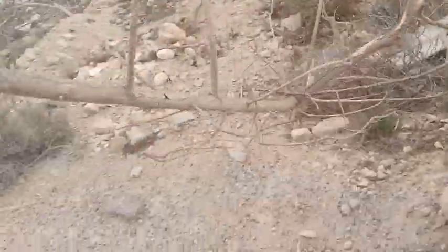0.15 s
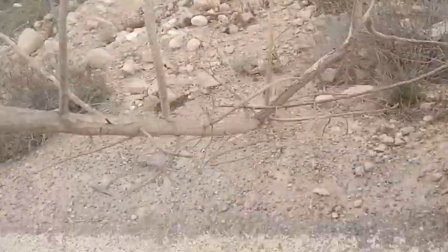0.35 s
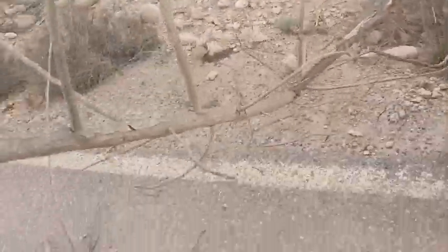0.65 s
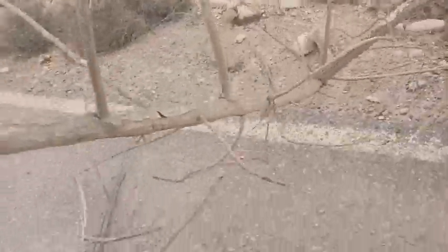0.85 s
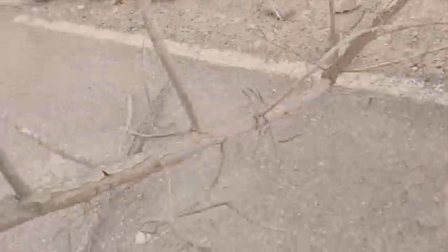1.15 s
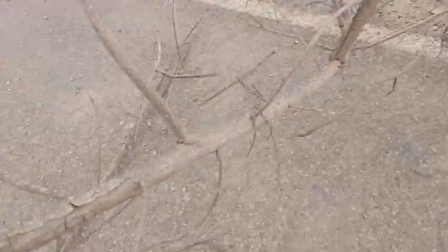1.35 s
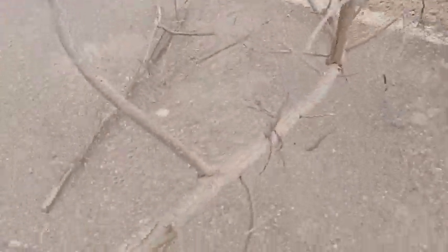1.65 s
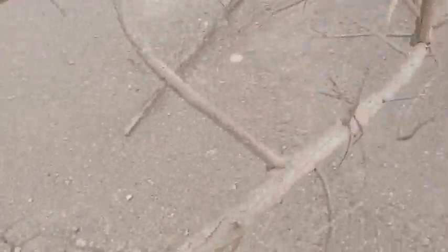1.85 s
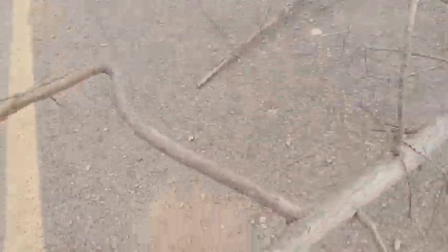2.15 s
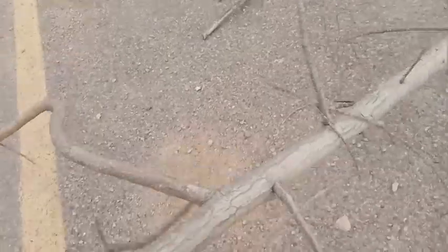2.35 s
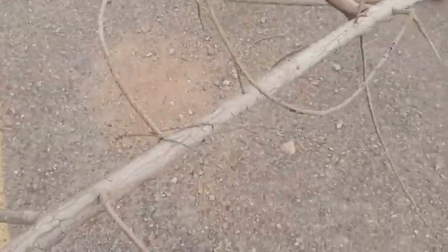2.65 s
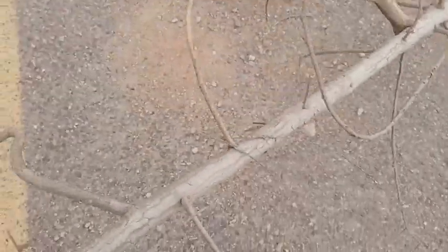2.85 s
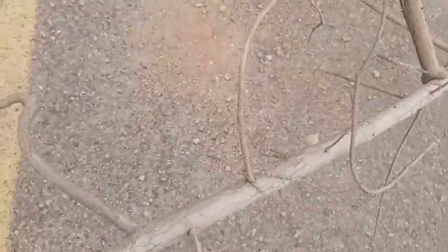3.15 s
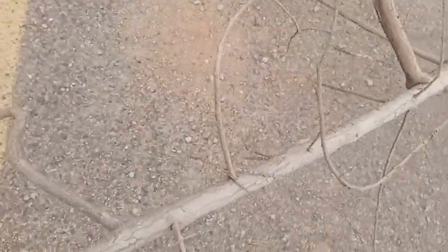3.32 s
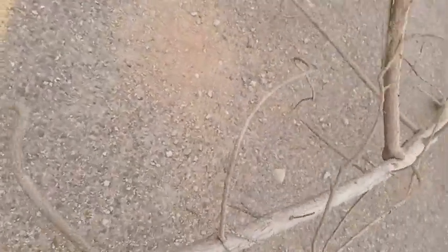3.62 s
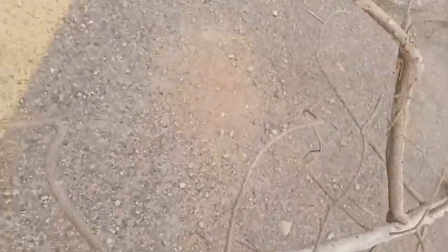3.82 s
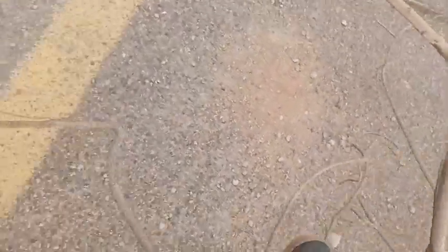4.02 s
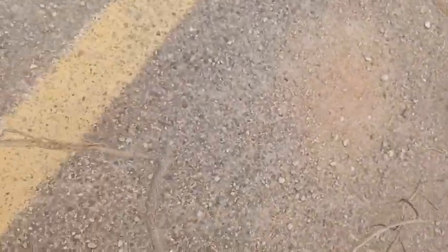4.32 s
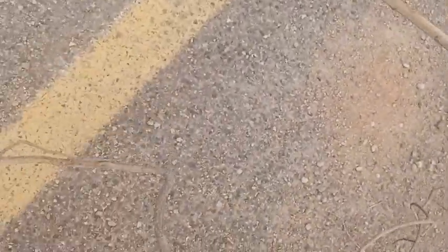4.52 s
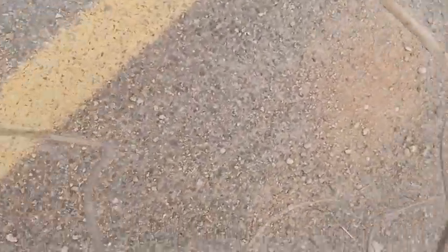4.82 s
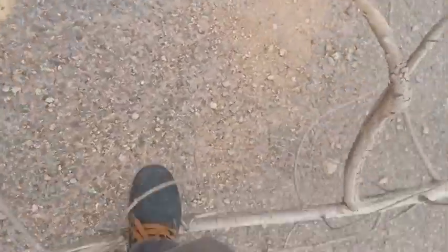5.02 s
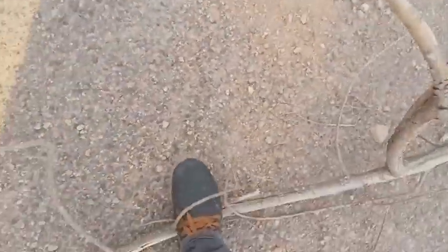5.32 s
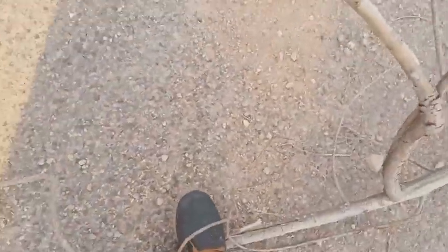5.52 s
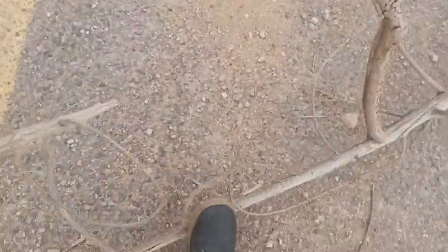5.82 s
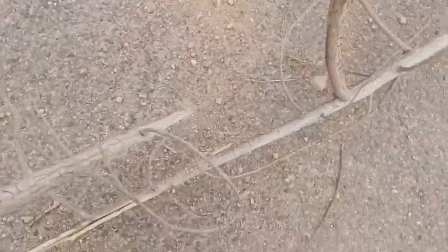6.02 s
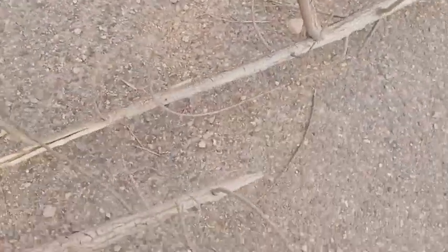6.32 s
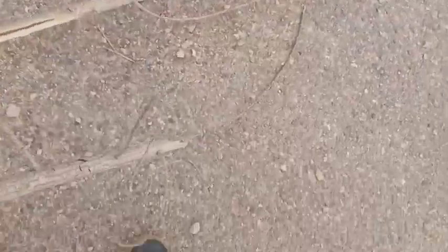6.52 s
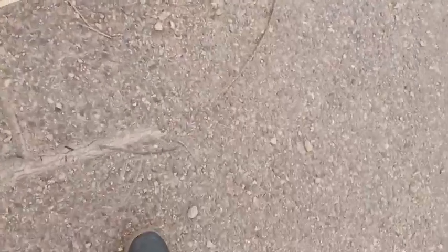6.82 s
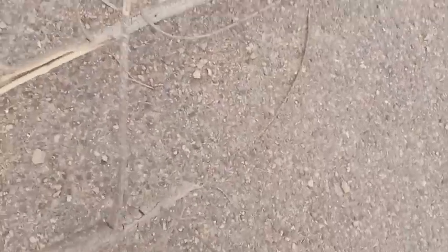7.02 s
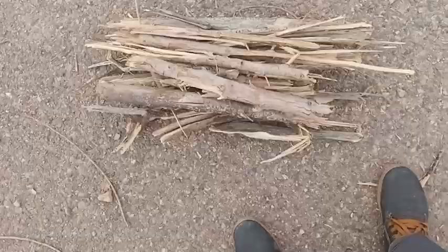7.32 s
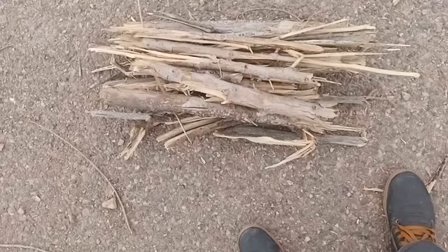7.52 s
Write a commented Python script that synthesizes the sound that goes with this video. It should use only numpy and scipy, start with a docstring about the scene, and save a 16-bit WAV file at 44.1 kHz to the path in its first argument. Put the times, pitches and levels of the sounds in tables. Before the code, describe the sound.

Outdoors, close to a hand-held stereo microphone, dry twigs rasp and tick across rough asphalt while wood cracks, knocks and hums dully. After a lull with only small clicks, treading brings crisp splintering, loudest about two thirds through. Wind then buffets the left side with soft low thumps, mingled with a few hollow wood knocks, over faint distant air, before a sudden cut to silence.

```python
"""A dead branch on a gritty road, close to a hand-held camera with two microphone ports of unlike colour.
From the start twig tips scrape, skip and tick (banded noise, short tones), over gusts of low noise at the left port
and faint distant air. Wood snaps (bursts of tiny cracks), knocks and rings (fading sines); the thick end hums in
its low modes. The drag quietens near 3 s; from 4.45 s the branch is trodden on, loudest near 5 s; gusts and
single thumps of air return after 5.3 s. The sound stops short at 7.3 s, before the end."""
import sys
import numpy as np
from scipy import signal
from scipy.io import wavfile
from scipy.ndimage import uniform_filter1d

SR = 44100
rng = np.random.default_rng(int(sys.argv[2]) if len(sys.argv) > 2 else 0)


def dump(signal):
    """Clip the signal to [-1, 1] and save it as 16-bit WAV at the path in sys.argv[1]."""
    limited = np.clip(np.atleast_2d(signal).T, -1, 1)
    pcm = np.round(limited * 32767).astype(np.int16)
    wavfile.write(sys.argv[1], SR, pcm)


N = 337663

# drag of the twigs over the road, ahead of the port colours: t/s, twig level/dB, wood level/dB, grit level/dB
DRAG_CURVE = [(0, -42, -46.5, -40), (.4, -41, -42, -42), (.7, -47.5, -50, -45.5), (1.01, -32, -37, -42.5),
              (1.17, -35.5, -37, -38), (1.35, -45.5, -40, -44.5), (2, -40.5, -38.5, -47),
              (2.54, -43, -41.5, -44), (2.76, -50, -54, -54.5), (3.2, -52, -63, -60),
              (3.6, -56, -49, -59.5), (3.9, -46.5, -51, -55), (4.2, -51.5, -56, -56.5),
              (4.45, -46.5, -54.5, -53.5), (4.85, -38, -51.5, -42), (5.1, -30, -33, -33.5),
              (5.35, -41.5, -44, -43.5), (5.57, -54, -48.5, -55.5), (6.05, -59.5, -50, -67),
              (6.62, -49.5, -39, -60.5), (7.04, -48, -45.5, -56.5), (7.3, -65.5, -53.5, -67.5)]
# what each microphone port makes of a flat sound: f/Hz, left level/dB, right level/dB
PORT_COLOURS = [(200, -4, -4), (500, -6, -4), (850, -4, -2), (1400, -7, -3), (2000, -8, -2),
                (2600, -11, -4), (3500, -12, 2), (4200, -13, 0), (5000, -13, -6), (6600, -13, -16),
                (7200, -15, -24), (7800, -20, -29), (9000, -15, -19), (11500, -18, -21), (13700, -21, -27),
                (14300, -14, -18), (14800, -10, -13), (15700, -12, -15), (17000, -12, -15)]
# bands of wood, twigs and grit, one row each: low f/Hz, high f/Hz
MATERIAL_BANDS = [(400, 2450), (2450, 5400), (5400, 18000)]
# left-right likeness of the noise of wood, twigs and grit [0 to 1]
LIKENESS = [.8, .4, .25]


def gain_of(db):
    """Amplitude factor of a level in dB."""
    return 10 ** (np.asarray(db) / 20)


def evened(x):
    """Scale to unit rms over all channels."""
    return x / np.sqrt(np.mean(x ** 2) + 1e-20)


def read(points, hz):
    """Columns of a spectrum table on a log-frequency axis."""
    f, *columns = np.transpose(points)
    return np.array([np.interp(np.log(hz + 1), np.log(f + 1), c) for c in columns])


def follow(rows):
    """Columns of a curve table at every sample."""
    s, *columns = np.transpose(rows)
    return [np.interp(np.arange(N) / SR, s, c) for c in columns]


def sides(pan_db):
    """Left and right gains for a level difference; positive leans left."""
    return gain_of(np.array([pan_db / 2, -pan_db / 2]))


def causal(db, size=4096):
    """Minimum-phase taps of a gain curve given on the half circle."""
    log_gain = np.log(gain_of(np.maximum(db, -100)))
    circle = np.concatenate([log_gain, log_gain[..., -2:0:-1]], -1)
    spectrum = np.exp(np.conj(signal.hilbert(circle)))
    return np.fft.ifft(spectrum).real[..., :size // 2]


def paired(a, b, alike):
    """Two channels that share a part of their noise."""
    alike = np.clip(alike, 0, 1)
    return np.array([a, alike * a + np.sqrt(1 - alike ** 2) * b])


def add(mix, s, sound):
    """Lay a sound into the mix at s seconds, cut at the end."""
    part = mix[..., round(s * SR):][..., :sound.shape[-1]]
    part += sound[..., :part.shape[-1]]


def resonate(x, hz, width):
    """One damped mode driven by x, with unit gain for noise."""
    r = np.exp(-np.pi * width / SR)
    feedback = [1, -2 * r * np.cos(2 * np.pi * hz / SR), r * r]
    return signal.lfilter([1, 0, -1], feedback, x) * np.sqrt((1 - r * r) / 2)


def grains(per_s, spread_db, decay_s):
    """Loudness contours of random tiny slips, each stronger in some bands (wood, twigs, grit) than in others."""
    size = gain_of(spread_db * np.minimum(rng.exponential(1, N), 3.5)) * (rng.random(N) < per_s / SR)
    size = size * gain_of(2.5 * rng.standard_normal((3, N)))
    t = np.arange(1500) / SR
    slip = np.exp(-t / decay_s) * (1 - np.exp(-t / 0.00062))
    slips = signal.oaconvolve(size, slip[None], axes=1)[:, :N]
    return slips / np.sqrt(np.mean(slips ** 2))


def place_db():
    """Left-right place of the branch, drifting slowly to the left."""
    start_db, drift_db_per_s = -0.84, 0.57
    return start_db + drift_db_per_s * np.arange(N) / SR


def ports(drive):
    """Wood, twig and grit drives each pass their own band of the two port colours, evened to a common gain."""
    hz, out = np.fft.rfftfreq(4096, 1 / SR) + 1, 0
    for part, (low_hz, high_hz) in zip(drive, MATERIAL_BANDS):
        skirt_db = -10 * np.log10((1 + (low_hz / hz) ** 6) * (1 + (hz / high_hz) ** 6))
        taps = causal(read(PORT_COLOURS, hz) + skirt_db)
        out = out + signal.oaconvolve(part, 2 * taps / np.linalg.norm(taps), axes=1)[:, :N]
    return out


def scrape(rub=0.81):
    """Twig tips rub steadily and skip from stone to stone: noise under a steady and a grainy contour."""
    twig_db, wood_db, grit_db = follow(DRAG_CURVE)
    skips = grains(350, 4.5, .004)
    touch = evened(rub + skips) * gain_of([wood_db, twig_db, grit_db])
    noise, place = rng.standard_normal((3, 2, N)), sides(place_db())
    out = np.array([level * place * paired(*n, c) for level, n, c in zip(touch, noise, LIKENESS)])
    out[:, 0] = np.roll(out[:, 0], 6, axis=1)  # samples; the tips lie nearer the right port
    return out


def ticks(count=30, spread_db=3.0):
    """Many small twigs, each with its own damped note, tick on the stones while the branch drags."""
    ticks_per_s, tick_db = 200, -4.5
    fade_cycles, lowest_hz, highest_hz = 2.5, 437, 6340
    twig_db, wood_db, _ = follow(DRAG_CURVE)
    out, t = np.zeros((2, N)), np.arange(2000) / SR
    size = gain_of(spread_db * np.minimum(rng.exponential(1, N), 3.5)) * (rng.random(N) < ticks_per_s / SR)
    which = rng.integers(0, count, N)
    for k, hz in enumerate(np.geomspace(lowest_hz, highest_hz, count)):
        ring = np.sin(2 * np.pi * hz * t) * np.exp(-t * hz / fade_cycles)
        left_db, right_db = read(PORT_COLOURS, hz)
        drag_db = wood_db if hz < MATERIAL_BANDS[0][1] else twig_db
        level = gain_of(max(left_db, right_db) + drag_db)
        train = signal.oaconvolve(size * (which == k), ring / np.linalg.norm(ring))[:N]
        out += sides(left_db - right_db)[:, None] * level * train
    return gain_of(tick_db) * out / np.sqrt(np.mean(size ** 2))


def thick_end(bumps_per_s=120):
    """The heavy end bumps over stones and hums in its low modes."""
    # how hard the thick end drags: t/s, rms level/dB
    drag_levels = [(0, -81), (1.1, -52), (1.6, -35), (2.3, -34), (2.7, -51.5), (4.3, -51.5), (5, -43.5),
                   (5.6, -47.5), (6.2, -42), (7, -36), (7.31, -43.5)]
    # modes of the thick end: f/Hz, width/Hz, relative level/dB
    modes = [(242, 120, 15), (483.6, 76, 8), (620, 144, 12.5), (938, 39, -3)]
    t = np.arange(1500) / SR
    hits = rng.exponential(1, N) * (rng.random(N) < bumps_per_s / SR)
    bumps = signal.oaconvolve(hits, np.exp(-t / 0.0084))[:N]
    drive = paired(*rng.standard_normal((2, N)), 0.77) * (0.55 + evened(bumps))
    hum = sum(gain_of(db) * resonate(resonate(drive, hz, 2 * width), hz, width) for hz, width, db in modes)
    return gain_of(follow(drag_levels)[0]) * evened(hum)


def gusts():
    """Contour of the wind: each gust rises fast, holds and dies away over a light breeze, summed in power."""
    # gusts at the ports: t/s when fully risen, hold/s, relative level/dB
    gust_rows = [(0, 0.15, -28.5), (0.284, 0.25, -30.5), (0.778, 0.54, -32), (1.59, 0.17, -35),
                 (2.082, 0.18, -35), (2.532, 0.13, -38.5), (2.928, 0.012, -41.5), (3.105, 0.28, -40),
                 (3.6, 0.18, -41), (4.012, 0.0062, -33), (4.26, 0.035, -37.5), (4.75, 0.11, -40.5),
                 (5.36, 0.091, -27.5), (6.109, 0.04, -28.5), (6.354, 0.18, -27), (6.614, 0.036, -24.5),
                 (6.961, 0.022, -30)]
    rise_s, fall_db_per_s, breeze_db = 0.036, 130.5, -48  # breeze on the same relative scale
    t, power = np.arange(N) / SR, gain_of(breeze_db) ** 2
    for s, hold, db in gust_rows:
        rise = np.clip((t - s) / rise_s + 1, 0, 1)
        fall_db = fall_db_per_s * np.maximum(t - s - hold, 0)
        power = power + (rise * gain_of(db - fall_db)) ** 2
    return np.sqrt(power)


def wind(lumps_db=6.5, lump_s=.012, shelter_db=-14):
    """Eddies buffet each port on their own: low noise in short lumps; the right port is sheltered."""
    # colour of the wind rumble: f/Hz, relative level/dB
    rumble_colour = [(25, -44), (45, -23.5), (65, -1.5), (110, 1.5), (190, -3), (300, -10.5), (450, -19),
                     (800, -37), (2000, -62.5)]
    noise, lumps = rng.standard_normal((2, 2, N))
    width = int(lump_s * SR)
    lumps = evened(uniform_filter1d(uniform_filter1d(lumps, width), width))
    lumpy = noise * gain_of(lumps_db * np.tanh(lumps / 2) * 2)
    taps = causal(read(rumble_colour, np.fft.rfftfreq(4096, 1 / SR)))
    rumble = evened(signal.oaconvolve(lumpy, taps, axes=1)[:, :N])
    return 2 * gusts() * rumble * gain_of([[0], [shelter_db]])


def air():
    """Smooth distant hiss of the open country: steady coloured noise, almost unlike at the two ports."""
    # colour of the distant air: f/Hz, relative density level/dB per Hz
    hiss_colour = [(100, -61), (400, -76), (1500, -69), (5000, -114.5), (16000, -142)]
    a, b = rng.standard_normal((2, N))
    taps = causal(read(hiss_colour, np.fft.rfftfreq(4096, 1 / SR))) * np.sqrt(SR / 2)
    return signal.oaconvolve(paired(a, b, 0.058), taps, axes=1)[:, :N]


def snaps(tail_db_per_s=4000, steady=.5):
    """Fibres splinter in a run of tiny cracks; the thicker wood rings briefly; sound reaches one port first."""
    # snaps, knocks and scuffs: t/s, length/s, twig level/dB, wood and grit level/dB relative to the twigs
    events = [(0.014, 0.039, -40.5, 10, 3), (0.201, 0.073, -34, -15, 1), (0.302, 0.034, -31, 4, 1.5),
              (0.322, 0.022, -23, -19.5, -7.5), (0.348, 0.029, -33.5, 10, 2),
              (0.387, 0.022, -30.5, 1, -2.5), (0.517, 0.0083, -34.5, -1, -4),
              (0.541, 0.017, -27.5, -6, 4.5), (0.732, 0.02, -42, 6.5, 5.5), (0.777, 0.031, -34, 0, -12),
              (0.806, 0.031, -35, 6.5, -7), (0.836, 0.007, -26.5, 1, -20), (0.865, 0.0083, -26, 0.5, 1.5),
              (0.903, 0.045, -31.5, 5, -3), (0.937, 0.017, -27.5, -11, 7), (0.955, 0.01, -31, 0, 12),
              (0.975, 0.016, -29, -1, 1), (1.041, 0.026, -29, 6, -26), (1.071, 0.025, -29, -7, 4.5),
              (1.117, 0.021, -39.5, 13.5, -15), (1.155, 0.024, -26.5, 1.5, 2.5),
              (1.188, 0.029, -26.5, 0.5, -7), (1.223, 0.0086, -22, 5.5, -7), (1.295, 0.021, -27, 0, -2.5),
              (1.338, 0.014, -27.5, 5.5, -9), (1.394, 0.0062, -22.5, -2, -40.5),
              (1.445, 0.0081, -40.5, 13.5, 10.5), (1.487, 0.018, -39, 7.5, -13),
              (1.582, 0.023, -37, -14, 1), (1.641, 0.016, -27, -0.5, -3.5), (1.669, 0.035, -33.5, 2, -3),
              (1.721, 0.034, -25.5, -1.5, -9), (1.77, 0.0072, -38, 7, 9.5), (1.85, .008, -27.5, -11, -2),
              (1.891, 0.012, -22.5, -1, -2.5), (1.936, 0.0077, -29.5, 7, -0.5), (1.945, 0.058, -34, 10, -1),
              (2.003, 0.002, -22.5, 7, -15), (2.112, 0.031, -40.5, 3, 4), (2.22, 0.015, -34.5, -6, 5.5),
              (2.29, 0.0078, -30, 4.5, -3), (2.509, 0.023, -36.5, 1, 7.5), (2.526, 0.079, -29, -1.5, 4.5),
              (2.595, 0.042, -33, 2.5, 3.5), (2.643, 0.033, -21.5, -5.5, -4.5),
              (2.689, 0.018, -29, -5.5, 1.5), (2.718, 0.026, -36.5, 3.5, 4), (2.868, 0.02, -43.5, 2, 5.5),
              (2.909, 0.075, -37.5, -3.5, 3), (3.049, 0.014, -41, 0, -3), (3.103, .001, -27, 1, -10),
              (3.181, 0.024, -39, 1.5, 9.5), (3.237, 0.02, -45.5, 5, 7.5), (3.279, 0.032, -39, 2, 2),
              (3.3238, 0.0018, -23.5, -2, 10), (3.345, 0.029, -45, 12.5, -6), (3.384, 0.01, -53.5, 6, 18),
              (3.452, 0.0044, -34.5, 0, -6), (3.678, 0.015, -39, -2.5, 11.5),
              (3.752, 0.035, -31.5, -6.5, 3), (3.821, 0.0069, -34.5, -26, 13.5),
              (3.832, 0.033, -22, -9, -3.5), (3.864, 0.012, -44, 0, 21), (3.931, 0.041, -39.5, -1, 0),
              (3.993, 0.0055, -38, 3, 16.5), (4.01, 0.03, -34.5, -16, 4.5), (4.043, 0.025, -31.5, -7, 4),
              (4.098, 0.032, -31, -6, 0.5), (4.229, 0.013, -26.5, -38, 2.5),
              (4.248, 0.0042, -27.5, -34, 14), (4.255, 0.039, -27.5, -16, -1), (4.323, 0.034, -42, -24, 4),
              (4.376, .002, -25, -25, 0), (4.385, 0.0027, -29, -28, -1), (4.396, 0.0028, -25, -29, 2),
              (4.402, 0.027, -28.5, -6, 2.5), (4.471, 0.0054, -22.5, -15, -1.5),
              (4.504, 0.0026, -23, -27, 0.5), (4.519, 0.0037, -25, -26, -6),
              (4.552, 0.0097, -48.5, 14, -10), (4.596, 0.0072, -28, -29, 7.5),
              (4.61, 0.012, -22, -10.5, -4), (4.636, 0.0072, -25, -2.5, 9.5),
              (4.643, 0.051, -30.5, -3.5, 5), (4.676, 0.0061, -28.5, -23, -10.5),
              (4.73, 0.029, -26.5, -15.5, 4.5), (4.759, 0.0058, -21, -17, -13),
              (4.797, 0.0063, -31, -22, 6), (4.81, 0.012, -30.5, -4, 5.5), (4.854, 0.0074, -35, -15.5, 9.5),
              (4.908, 0.026, -18, -1, 0), (4.977, 0.0019, -16.5, -5, 3.5), (4.982, 0.017, -28.5, 5, -22),
              (5.003, 0.017, -20.5, -2, -11), (5.026, 0.017, -21.5, -0.5, 2), (5.045, 0.025, -25.5, 1, -6),
              (5.081, 0.0034, -21.5, -10, 6), (5.102, 0.0022, -18, -5, -3),
              (5.121, 0.0092, -25, -14.5, 6.5), (5.14, 0.0063, -17, -28, -4),
              (5.205, 0.014, -18.5, -8.5, -0.5), (5.224, 0.013, -29.5, -1, 9.5), (5.284, 0.02, -31, -2, 0),
              (5.343, 0.0035, -37, -17, 9), (5.411, 0.029, -34.5, 12, -11),
              (5.471, 0.0023, -21.5, -3.5, -9), (5.622, 0.01, -28.5, -10.5, 3),
              (5.645, 0.0023, -18.5, -1.5, -5), (5.65, 0.027, -33.5, -4, -1),
              (5.717, 0.19, -38.5, -4.5, -1.5), (5.792, 0.069, -39, -2.5, -2.5),
              (5.913, 0.028, -41, -19, -28), (6.036, 0.0034, -46.5, -11, 3.5), (6.14, 0.034, -31, 11, -4.5),
              (6.163, 0.021, -37, 3, -11), (6.25, 0.0034, -36.5, -3, -13), (6.331, 0.054, -43, -0.5, -26.5),
              (6.476, 0.0039, -28, 8, -15.5), (6.532, 0.0083, -34, 8.5, -5),
              (6.549, 0.0011, -16.5, -9, -11.5), (6.561, 0.016, -28, 1.5, -15), (6.593, 0.0046, -31, 4, -7),
              (6.601, 0.0099, -34, 11.5, -3), (6.622, 0.0024, -17, 5, -29),
              (6.747, 0.076, -37.5, -29.5, -6), (6.841, 0.012, -30.5, -19, -29),
              (6.896, 0.01, -34, -22, -27.5), (7.132, 0.04, -46.5, 5.5, -0.5)]
    # notes of the branch, a blow wakes one of them: f/Hz
    wood_notes = [560, 680, 866, 1063, 1300, 1620, 1800, 2300, 2350]
    tail_share = 0.91  # a scuff dies away over about this share of its length
    tread_s, drag_lag_s, tread_lag_s = 4.45, -.00025, .0004  # right port: dragging early, treading late
    out, t = np.zeros((3, 2, N)), np.arange(3500) / SR
    splinters = np.pad(steady + grains(600, 5.5, 0.0015), ((0, 0), (0, len(t))))
    fibres, chance = rng.standard_normal((len(events), 3, 2, len(t))), rng.random((len(events), 4))
    where_db = place_db()
    for (s, length, db, wood_db, grit_db), noise, (lag, pan, note, mode) in zip(events, fibres, chance):
        start = round(s * SR)
        rise = 1 - np.exp(-t / (0.0006 + 0.15 * length))  # long scuffs swell, short snaps start fast
        body_db = 4.0 - 11.24 * np.minimum(t / length, 1) ** 0.51
        tail_db = np.maximum(t - length, 0) / (1 / tail_db_per_s + tail_share * length / 20)
        fade = rise * gain_of(body_db - tail_db)
        run = splinters[:, start:][:, :len(t)]
        wood, twig, grit = [fade * f * paired(*n, c) for f, n, c in zip(run, noise, LIKENESS)]
        # wood is well damped
        wood_ring = 0.17 * resonate(wood, wood_notes[int(mode * len(wood_notes))], 140)
        wood = wood + wood_ring + 0.11 * resonate(wood, 1500, 1400)
        twig = twig + 0.26 * resonate(twig, 2800 + 1800 * note, 410)  # a chance note for each twig
        crack = np.array([wood, twig, grit])
        energy = np.linalg.norm(fade) / np.linalg.norm(crack, axis=(1, 2))  # the blow sets the energy
        level = energy * gain_of([db + wood_db, db, db + grit_db])
        place = sides(where_db[start] + 2.0 * (pan - .5))[:, None]
        sound = level[:, None, None] * place * crack * np.sqrt(2)
        add(out[:, 0], s, sound[:, 0])
        right_lag_s = lag * 0.00032 + (drag_lag_s if s < tread_s else tread_lag_s)
        add(out[:, 1], s + right_lag_s, sound[:, 1])
    return out


def thumps():
    """Single eddies: a push of air of about two cycles on the left membrane."""
    # eddies at the left port: onset t/s, level/dB (doubled in amplitude below), f/Hz
    eddies = [(0.041, -18, 140), (.053, -18.5, 142), (.203, -19.5, 169), (0.23, -21.5, 158),
              (0.535, -19.5, 140), (0.72, -20, 139), (0.093, -9, 227), (0.136, -15.5, 177),
              (1.738, -23.5, 102), (3.588, -29.5, 220), (4.01, -29.5, 98), (5.357, -19, 139),
              (5.383, -22, 150), (5.451, -23, 110), (5.486, -21, 187), (6.356, -16, 156), (6.415, -13, 148),
              (6.451, -16.5, 234), (6.469, -14, 150), (6.49, -17, 203), (6.515, -11.5, 250),
              (6.533, -16, 170), (6.613, -14, 144), (6.651, -17.5, 200), (6.734, -22, 202),
              (6.95, -12.5, 184), (7.031, -17, 164), (7.057, -24.5, 198), (7.088, -20.5, 286)]
    out, t = np.zeros((2, N)), np.arange(2000) / SR
    for s, db, hz in eddies:
        turns = hz * t - 1.4  # the push peaks 1.4 cycles after its onset
        add(out[0], s, 2 * gain_of(db) * np.cos(2 * np.pi * turns) * np.exp(-(turns / 0.58) ** 2))
    return out


def struck_wood(blows, ring_s):
    """A hard blow cracks, then rings the wood; each port hears the note at its own strength."""
    crack_db, crack_s = -5.0, .0005  # the dry crack that starts a blow
    fade_cycles, rise_s = 0.17, 0.0002  # the fading time to a third is these cycles plus ring_s
    out, t = np.zeros((2, N)), np.arange(3000) / SR
    cracks = rng.standard_normal((len(blows), len(t))) * t * np.exp(-t / crack_s)
    for (s, db, hz), phase, crack in zip(blows, rng.random(len(blows)), cracks):
        ring = np.sin(2 * np.pi * (hz * t + phase))
        fade = (1 - np.exp(-t / rise_s)) ** 2 * np.exp(-t / (fade_cycles / hz + ring_s))
        left_db, right_db = read(PORT_COLOURS, hz)
        # thick wood cracks duller
        band = signal.butter(3, [.4 * hz, hz + 2000], "bandpass", fs=SR)
        crack = signal.lfilter(*band, crack)
        blow = ring * fade / fade.max() + gain_of(crack_db) * crack / abs(crack).max()
        add(out, s, gain_of(db) * sides(left_db - right_db)[:, None] * blow)
    return out


def knocks():
    """Clean short knocks, low on thick wood and high on thin twigs."""
    # knocks: t/s, level/dB of the note ahead of the port balance, f/Hz
    knock_rows = [(0.044, -15, 2030), (0.353, -10, 1270), (0.6, -19, 720), (0.782, -18, 3300),
                  (.868, -26, 3670), (0.944, -21, 3700), (1.031, -17.5, 5150), (1.053, -17, 1900),
                  (1.077, -20, 3800), (1.145, -20.5, 3470), (1.1995, -16, 3000), (1.217, -14.5, 2570),
                  (1.228, -9, 2050), (1.292, -13.5, 1610), (1.341, -14, 2130), (1.3985, -14.5, 3180),
                  (1.626, -17.5, 765), (1.729, -17, 2360), (1.744, -12, 830), (1.95, -17, 1130),
                  (2.002, -15.5, 750), (2.108, -21, 750), (2.226, -23.5, 705), (2.293, -19, 1140),
                  (2.337, -23, 653), (2.421, -22, 710), (3.046, -24.5, 880), (3.072, -25.5, 1950),
                  (3.086, -28, 1000), (3.097, -24.5, 1800), (3.1041, -28, 1800), (3.105, -27.5, 4360),
                  (3.169, -35, 2030), (3.326, -30, 6540), (3.361, -38, 1620), (3.96, -15.5, 720),
                  (4.469, -24, 3870), (4.6405, -15.5, 4280), (4.685, -12.5, 4000), (4.738, -19.5, 3900),
                  (4.912, -13, 620), (4.9158, -10.5, 2800), (4.978, -18, 3600), (4.9925, -19, 2970),
                  (5.009, -14, 2800), (5.017, -11.5, 2530), (5.0313, -11, 3080), (5.055, -11, 3080),
                  (5.0625, -16, 3260), (5.084, -18.5, 3440), (5.104, -9, 3360), (5.141, -12.5, 3560),
                  (5.208, -14.5, 3160), (5.236, -23, 3720), (5.647, -11, 3420), (5.824, -12, 683),
                  (6.123, -10.5, 1400), (6.142, -20, 1500), (6.1553, -15, 1630), (6.1606, -23, 2070),
                  (6.1732, -13, 1950), (6.1823, -17, 1720), (6.479, -27, 1300), (6.549, -10.5, 3750),
                  (6.576, -30, 2170), (6.6046, -9, 990), (6.623, -17, 980), (6.6446, -12.5, 1160),
                  (6.756, -28, 3540), (6.775, -25, 3300), (6.786, -16.5, 3640), (6.7975, -29, 3400),
                  (6.805, -16.5, 3360), (6.821, -37, 3420), (6.8355, -24, 3480), (6.849, -30, 3400),
                  (6.888, -29, 3270), (6.892, -25, 3480), (6.928, -36.5, 3360), (7.061, -27.5, 2040)]
    return struck_wood(knock_rows, ring_s=0.0011)


def limb_rings():
    """Blows after which a stout limb rings on, fading more slowly than a knock."""
    # ringing blows: t/s, level/dB of the note ahead of the port balance, f/Hz
    ring_rows = [(0.356, -18.5, 1325), (4.655, -26.5, 1350), (5.209, -17.5, 871)]
    return struck_wood(ring_rows, ring_s=0.012)


def shifting(x, shift_db=2.0):
    """The colour shifts as twigs turn: patches some hundred hertz wide swell and fade within tens of ms."""
    z = signal.stft(x, nperseg=256)[2]
    patches = uniform_filter1d(rng.standard_normal(z.shape[1:]), size=3, axis=0)
    patches = uniform_filter1d(patches, size=9, axis=1)
    mean_power_db = shift_db ** 2 * np.log(10) / 20  # taken off to keep the mean power
    change = gain_of(shift_db * evened(patches) - mean_power_db)
    return signal.istft(z * change, nperseg=256)[1][:, :N]


def scene():
    """Sum the branch, the wind and the distant air at the two ports."""
    branch = shifting(ports(scrape() + snaps())) + ticks() + thick_end()
    blows = knocks() + limb_rings()
    return branch + blows + wind() + thumps() + gain_of(-14.5) * air()


def record(dry):
    """The loudest cracks overload softly; the sound stops abruptly; then the band limit."""
    edge_hz, stop_s = 15880, 7.308
    overloaded = np.tanh(dry / 1.2) * 1.2
    heard = overloaded * np.clip((stop_s - np.arange(N) / SR) / .002, 0, 1)
    low_pass = signal.firwin(767, edge_hz, window=("kaiser", 10), fs=SR)
    return signal.oaconvolve(heard, low_pass[None], "same")


dry = scene()
out = record(dry)
dump(out)
```